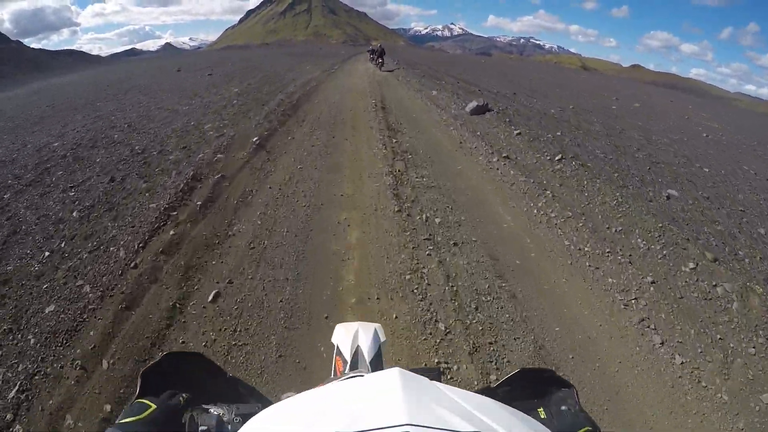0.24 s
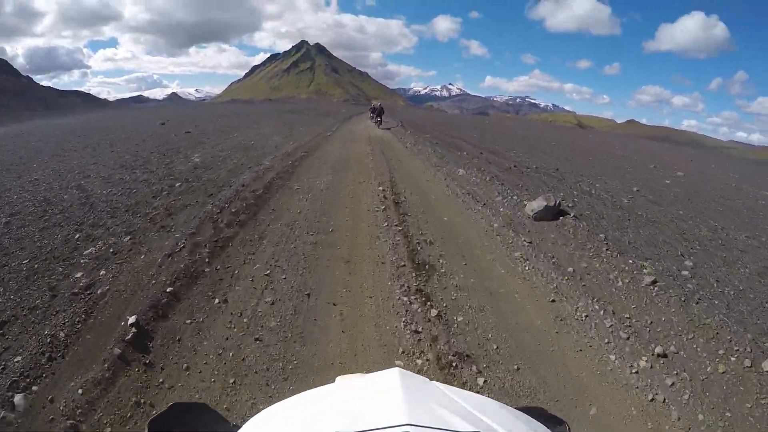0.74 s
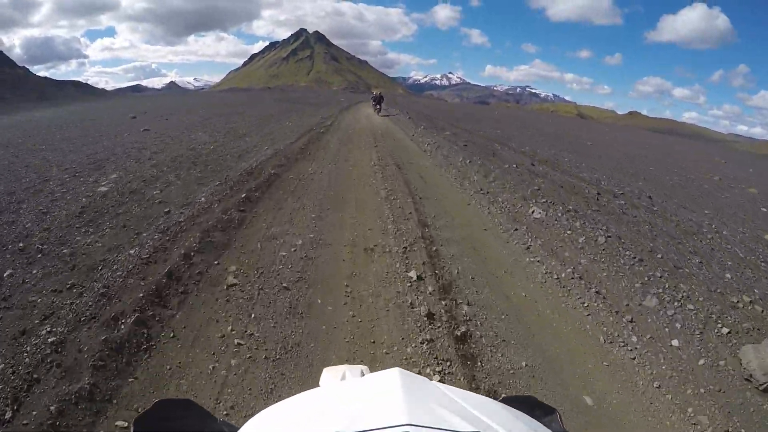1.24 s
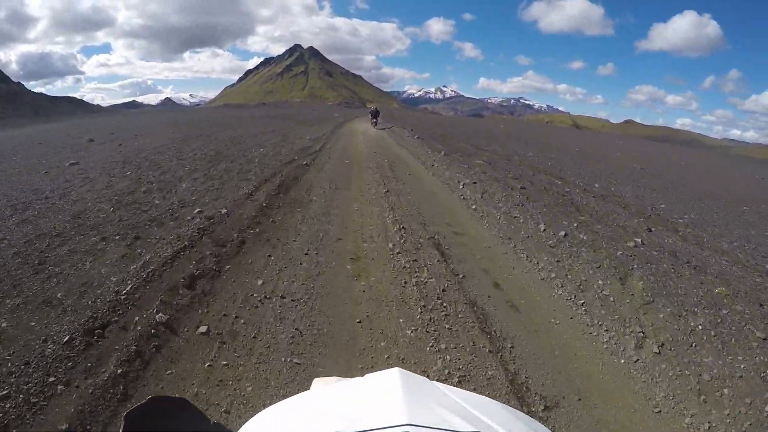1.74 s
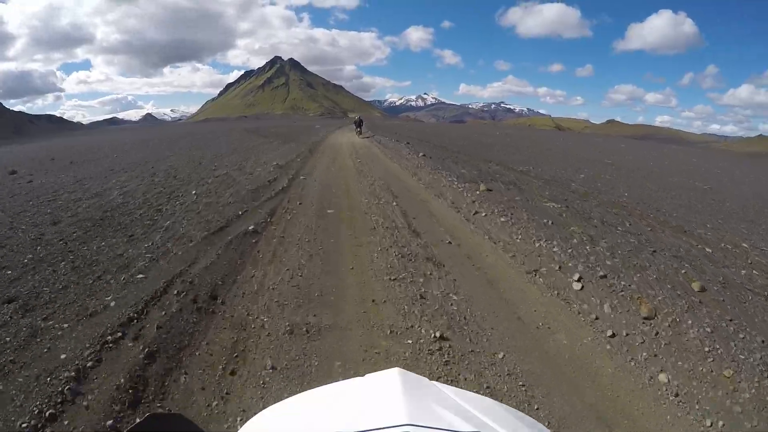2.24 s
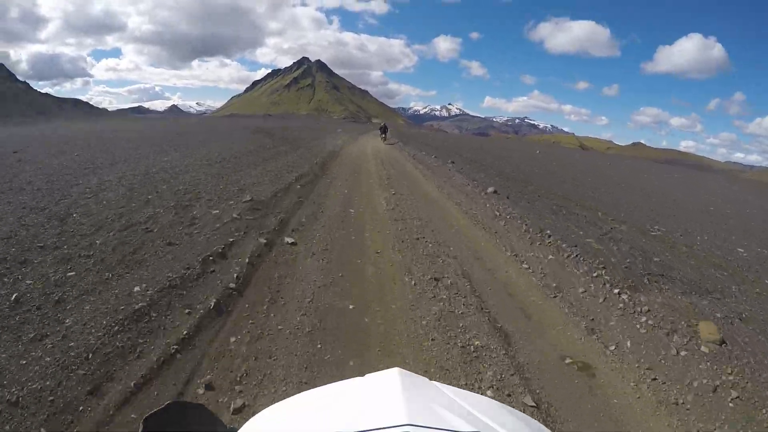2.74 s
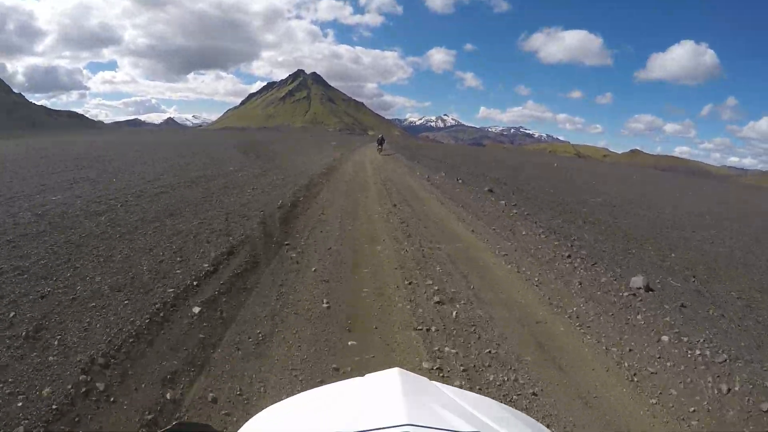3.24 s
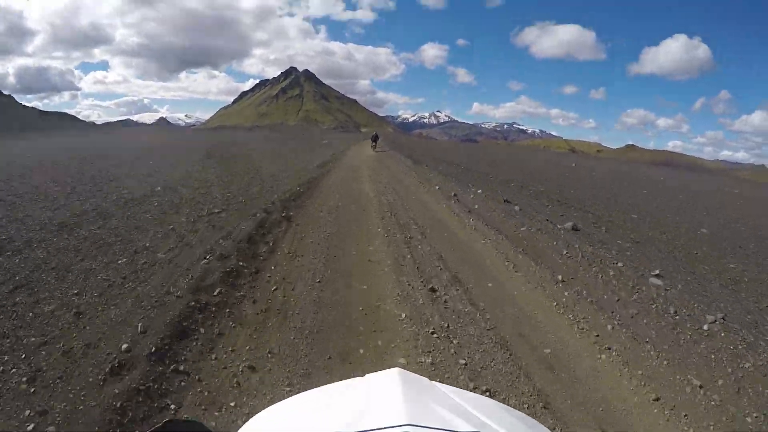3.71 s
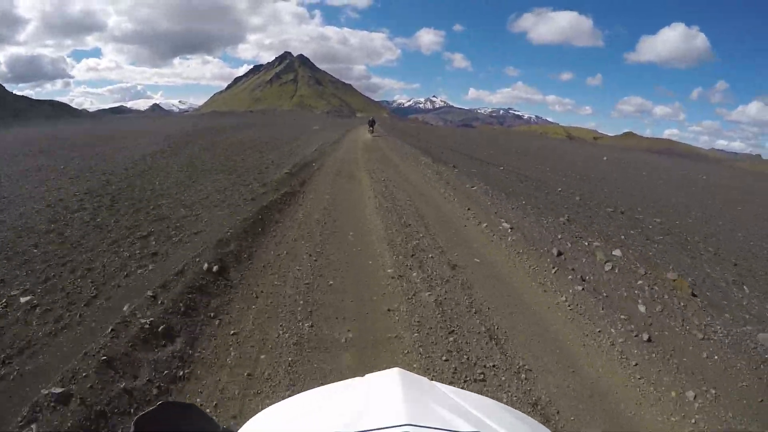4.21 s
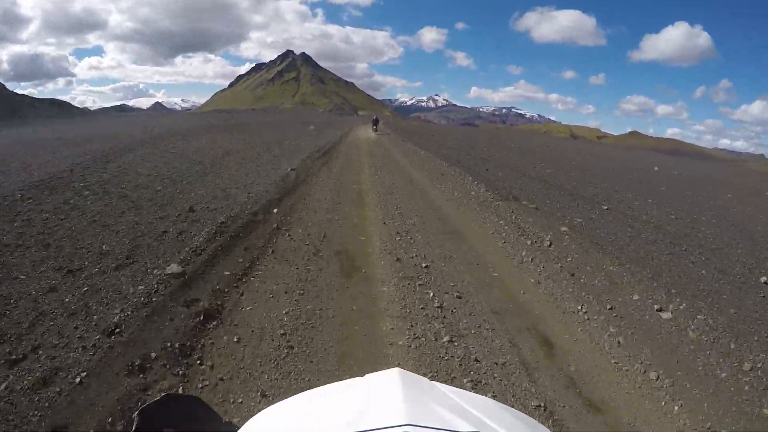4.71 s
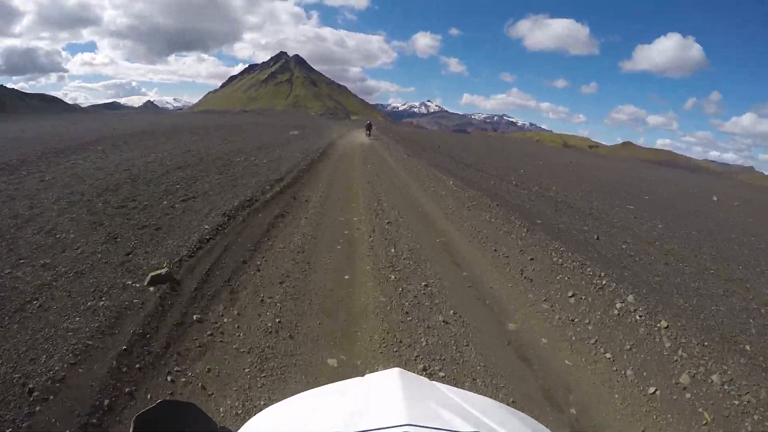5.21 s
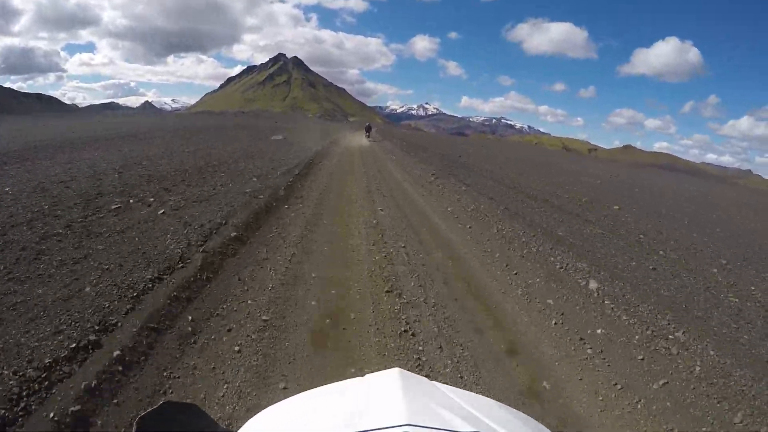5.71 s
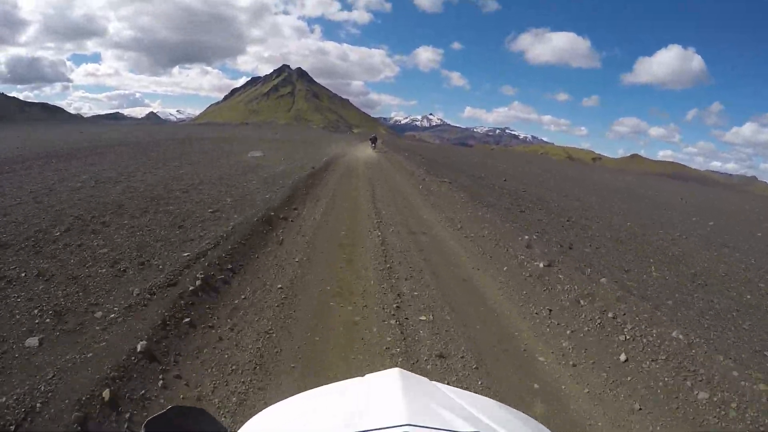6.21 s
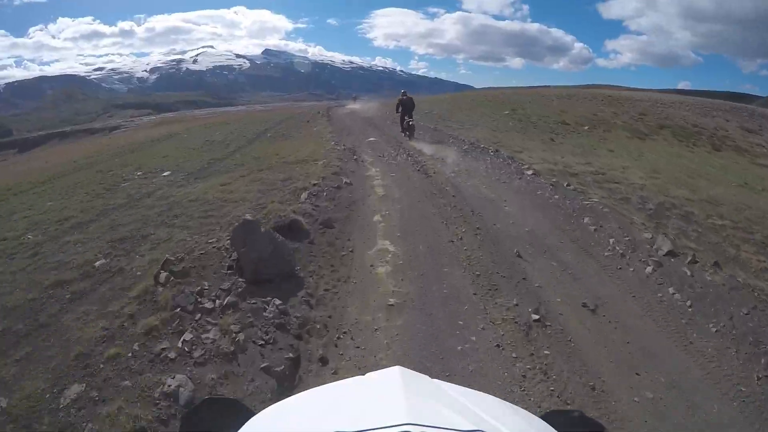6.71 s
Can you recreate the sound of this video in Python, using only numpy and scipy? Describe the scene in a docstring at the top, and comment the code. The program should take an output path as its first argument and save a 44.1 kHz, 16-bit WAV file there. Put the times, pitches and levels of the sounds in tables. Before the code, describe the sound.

Low wind buffeting and the thudding exhaust of a dirt bike are heard close up from the rider's position outdoors. The revs rise with a light mechanical ticking, drop at a gear change, then build slowly as a fluttering wind hiss swells over them. A single hard, plastic-sounding knock overloads the microphone. Shortly before the end, a sudden cut leaves the engine running lower and the wind less bright.

```python
"""A single-cylinder dirt bike pulls along a gravel track and shifts up once, heard from a microphone on the
rider. Firings thump the exhaust; valve gear and chain clatter. Wind buffets the microphone housing and hisses
at its edges, growing with speed; low booms swell where the engine's note passes a resonance. One sharp knock,
likely a stone, overloads the microphone and ducks the gain. Near the end the ride jumps to another stretch of
track."""
import sys
import numpy as np
from scipy import signal
from scipy.fft import rfft, irfft
from scipy.io import wavfile
from scipy.ndimage import uniform_filter1d

SR = 44100
rng = np.random.default_rng(int(sys.argv[2]) if len(sys.argv) > 2 else 0)


def store_wav(level_fs):
    """Save 16-bit WAV to argv[1]."""
    pcm = np.round(np.clip(np.atleast_2d(level_fs), -1, 1) * 32767)
    wavfile.write(sys.argv[1], SR, pcm.T.astype(np.int16))


N = 306495
TIME_S = np.arange(N) / SR
JUMP_S = 6.414  # second stretch starts
SHUT_S, SHUT_FALL_S, OPEN_S, OPEN_RISE_S = 2.66, 0.42, 3.22, 0.17  # throttle in the upshift
CRUISE_HZ = 26  # reference firing rate

# Airflow, sagging in the shift. Each row: time in seconds, hiss level in dB.
AIRFLOW = [(0, -41), (.45, -42), (.78, -35.5), (2.1, -29.5), (2.3, -24), (2.83, -20), (3.47, -23),
           (3.8, -20), (4.75, -18.5), (5.45, -17), (6.95, -16.5)]
# Gusts. Each row: centre in seconds, half-length in seconds, added buffet in dB, added airflow in dB.
GUSTS = [(.62, 0.044, 1, 4.5), (1.05, 0.056, 1.5, 2), (1.853, 0.076, -0.5, 4), (2.305, 0.072, -2, 2),
         (2.703, 0.08, 2, 0.5), (3.84, 0.12, 3.5, 2), (4.567, 0.13, 3, 0.5), (5.52, 0.15, 3.5, 0),
         (6.0, .17, 4.5, 0)]
# Pressure swirls on the housing. Each row: frequency in Hz, relative level in dB.
BUFFET_SPECTRUM = [(8, -38), (18, 7), (30, 1), (55, -3.5), (85, -0.5), (112, -3), (135, -12.5),
                   (170, -17.5), (300, -20), (800, -54.5)]
# Air and tyre roar. Each row: frequency in Hz, relative level in dB.
ROAR_SPECTRUM = [(80, -8), (170, 2), (240, 1), (380, 4), (550, 2), (700, 4), (850, -1), (1100, -5),
                 (1500, -2), (2100, 5), (2800, -3.5), (5000, -42), (15000, -59)]
# Edge hiss. Each row: frequency in Hz, relative level in dB on the first stretch, same on the second.
HISS_SPECTRUM = [(500, -27, -34), (1020, -28, -18), (1510, -20.5, -4.5), (2230, -9.5, -10.5), (2360, -6, 1),
                 (3315, 0.5, 2.5), (3440, -3, -4.5), (3928, -0.5, -6), (4180, -13.5, -9),
                 (4610, -16.5, -25), (4910, -24, -25), (7080, -32.5, -34.5), (11600, -44, -41),
                 (14700, -62, -64)]
# Fine spray of the fastest air. Each row: frequency in Hz, relative level in dB.
SPRAY_SPECTRUM = [(1000, -31), (3500, -7), (4600, 8), (5500, 7.5), (7000, -1), (10000, -7), (12300, -6),
                  (15000, -21)]
# Peaks and notches of the housing's cavities. Each row: centre in Hz, width in Hz, gain in dB.
CAVITIES = [(1820, 28, -0.5), (2993, 36, 4.5), (4540, 130, 4), (5550, 245, 7), (6000, 150, -5.5),
            (6410, 210, 8.5), (8200, 250, -2)]
# Low booms. Each row: centre in seconds, frequency in Hz, level in dB.
LOW_BOOMS = [(.62, 97, -25.5), (3.03, 101, -25.5), (3.37, 100, -22.5), (3.95, 102.8, -25.5),
             (5.6, 100, -25), (6.0, 75.4, -23), (6.25, 104, -25.5)]
# Knock on the housing: start in seconds, gain in dB.
KNOCK = (4.6885, 11.2)
# Housing shell modes. Each row: frequency in Hz, T60 in seconds, relative level in dB.
SHELL_MODES = [(1716, 0.0063, 3), (1803, 0.041, -10), (1910, 0.039, -7), (3780, 0.012, -3),
               (4500, 0.0079, -4), (6440, 0.0087, -6.5), (7950, 0.0049, -5.5), (12100, 0.0022, -6)]
# Ring of valve gear and chain. Each row: frequency in Hz, relative level in dB.
CLATTER_SPECTRUM = [(500, -4), (1130, 1), (1320, 10), (1650, 5), (2200, 3.5), (3000, 9), (4000, -0.5),
                    (4400, -8), (5300, -6.5), (6500, -19), (8000, -18.5), (15000, -48)]
# Engine orders, low boom to high firing harmonics. Each row: multiple of the firing rate, base level in dB.
ENGINE_ORDERS = [(2, -41), (3, -50.5), (4, -46.5), (5, -54), (8, -58), (10, -57.5), (14, -53.5),
                 (15, -57.5)]
# Resonances the orders sweep through. Each row: centre in Hz, width in Hz, lift in dB.
ORDER_RESONANCES = [(115.7, 27, 8), (266.5, 16, 10.5), (450, 21, 7)]
# Exhaust, airbox and casing modes. Each row: frequency in Hz, width in Hz, relative gain in dB.
EXHAUST_MODES = [(100, 25, 1), (280, 66, -6), (344, 33, -1.5), (459, 32, 4.5), (670, 30, -7), (949, 19, -5),
                 (1264, 38, -7.5), (1362, 17.7, 1.5)]
# Revs through two gears on the first stretch. Each row: time in seconds, firing rate in Hz.
REVS = [(0.0, 19.9), (0.51, 22.6), (1.73, 28.8), (2.73, 34.2), (2.87, 31.3), (3.1, 25.4), (3.33, 25.1),
        (5.79, 32.1), (6.4, 32.6)]


def undb(db):
    """Decibels to gain."""
    return 10 ** (np.asarray(db) / 20)


def unit(x):
    """Scale to rms 1."""
    return x / np.sqrt(np.mean(x ** 2))


def bell(x, centre, width):
    """Gaussian, peak 1."""
    return np.exp(-((x - centre) / width) ** 2)


def curve(rows):
    """Timed table to one value a sample."""
    return np.interp(TIME_S, *np.transpose(rows))


def drift(rate_hz):
    """Low-passed noise, rms 1."""
    hz = np.fft.rfftfreq(N, 1 / SR)
    return unit(irfft(rfft(rng.standard_normal(N)) / (1 + (hz / rate_hz) ** 2), N))


def colour(x, spectrum, peaks=(), column=1):
    """Shape x by a spectrum column plus peaks and notches; rms 1."""
    hz, spectrum = np.fft.rfftfreq(N, 1 / SR), np.array(spectrum)
    db = np.interp(np.log(np.maximum(hz, 1)), np.log(spectrum[:, 0]), spectrum[:, column])
    db += sum(gain_db * bell(hz, centre, width) for centre, width, gain_db in peaks)
    return unit(irfft(rfft(x) * undb(db), N))


def airflow(later, buffet_db_per_db=0.19):
    """Air and buffet levels in dB: both rise with road speed, gusts on top."""
    air_db = curve(AIRFLOW)
    buffet_db = -23.5 + buffet_db_per_db * air_db - 1.5 * later
    for centre_s, half_s, gust_buffet_db, gust_air_db in GUSTS:
        gust = bell(TIME_S, centre_s, half_s)
        air_db += gust_air_db * gust
        buffet_db += gust_buffet_db * gust
    return air_db, buffet_db


def wind(roar_db_per_db=0.6, spray_db_per_db=2.29, shelter_db=-7):
    """Swirls buffet the housing; eddies flutter roar and hiss. Faster air is louder and brighter."""
    later = TIME_S >= JUMP_S  # less roar, lower hiss, no spray
    air_db, buffet_db = airflow(later)
    eddies, surges = drift(130), drift(5.7)
    buffet = colour(rng.standard_normal(N), BUFFET_SPECTRUM) * undb(buffet_db)
    roar = colour(rng.standard_normal(N) * undb(0.93 * eddies), ROAR_SPECTRUM)
    roar *= undb(-17.5 + roar_db_per_db * air_db + shelter_db * later)
    jet = rng.standard_normal(N) * undb(0.5 * eddies + 0.66 * surges)
    first_hiss = colour(jet, HISS_SPECTRUM, CAVITIES)
    later_hiss = colour(jet, HISS_SPECTRUM, CAVITIES, column=2)
    hiss = np.where(later, later_hiss, first_hiss) * undb(air_db)
    spray = colour(rng.standard_normal(N), SPRAY_SPECTRUM, CAVITIES)
    spray *= undb(2 + spray_db_per_db * air_db) * ~later
    return buffet + roar + hiss + spray


def low_booms(half_s=0.038):
    """A low tone near 100 Hz swells and dies, mostly the engine's note passing a resonance."""
    booms = np.zeros(N)
    for centre_s, hz, db in LOW_BOOMS:
        tone = np.sqrt(2) * np.sin(2 * np.pi * (hz * TIME_S + rng.random()))
        booms += undb(db) * bell(TIME_S, centre_s, half_s) * tone
    return booms


def knock(crack_db=-7.5, crack_s=0.0012):
    """Hard, tiny contact: a crack and the short ring of the plastic shell."""
    start_s, gain_db = KNOCK
    age_s = np.maximum(TIME_S - start_s, 0)
    ring = sum(undb(db - 60 * np.minimum(age_s / t60_s, 2)) * np.sin(2 * np.pi * hz * age_s)
               for hz, t60_s, db in SHELL_MODES)
    crack = undb(crack_db) * np.exp(-np.minimum(age_s / crack_s, 20)) * rng.standard_normal(N)
    return undb(gain_db) * (ring + crack) * (TIME_S >= start_s)


def clatter(cycles, firing_hz, tick_phase=0.504, tick_s=0.003, scatter_db=0.9, whirr=0.14):
    """Valve gear ticks once a cycle over the chain's even whirr."""
    tick_age = ((cycles - tick_phase) % 1) / firing_hz / tick_s
    ticks = undb(scatter_db * drift(16)) * tick_age * np.exp(1 - tick_age)
    return colour((whirr + ticks) * rng.standard_normal(N), CLATTER_SPECTRUM, CAVITIES[:2])


def hum(cycles, firing_hz, exhaust_db, load_share=0.29, low_gear_db=3, waver_db=2.5, lug_db=13):
    """Engine orders swell under load, in the lower gear and through resonances."""
    lug = np.clip((CRUISE_HZ - firing_hz) / 6, 0, 1)
    pull_db = load_share * (exhaust_db - exhaust_db.mean())
    pull_db += low_gear_db * np.clip((OPEN_S - TIME_S) / SHUT_FALL_S, 0, 1)
    tones = np.zeros(N)
    for order, base_db in ENGINE_ORDERS:
        lift_db = sum(db * bell(order * firing_hz, hz, width) for hz, width, db in ORDER_RESONANCES)
        level_db = base_db + lift_db + pull_db + waver_db * drift(3)
        if order == 2:  # crank's once-a-turn shake dominates at low revs
            level_db += lug_db * lug
        tones += undb(level_db) * np.sqrt(2) * np.cos(2 * np.pi * order * cycles)
    return tones


def exhaust(cycles, firing_hz, jitter_s=0.00004, scatter_db=1, gas_db=-18, gas_s=0.010):
    """Each firing rings the pipe with a pulse and a puff of gas."""
    firings = np.flatnonzero(np.diff(np.floor(cycles)))
    timing, strength = rng.standard_normal((len(firings), 2)).T
    firings += (jitter_s * SR * timing).astype(int)
    pulses = np.zeros(N)
    pulses[np.clip(firings, 0, N - 1)] = undb(scatter_db * strength)
    gas = np.exp(-(cycles % 1) / firing_hz / gas_s) * rng.standard_normal(N)
    drive = unit(pulses) + undb(gas_db) * unit(gas)
    pipe = np.zeros(N)
    for k, (hz, width_hz, db) in enumerate(EXHAUST_MODES):
        mode = signal.lfilter(*signal.iirpeak(hz, hz / width_hz, fs=SR), drive)
        pipe += (-1) ** k * undb(db) * mode  # neighbours in opposite phase
    return unit(pipe)


def engine(later_hz=25.54, later_rise_hz_per_s=2.88, later_throttle=0.25):
    """Two gears, then a gentle pick-up on the second stretch. Levels follow revs and throttle."""
    later = TIME_S >= JUMP_S
    firing_hz = np.where(later, later_hz + later_rise_hz_per_s * (TIME_S - JUMP_S), curve(REVS))
    cycles = 0.1003 + np.cumsum(firing_hz) / SR
    roll_off = np.clip((TIME_S - SHUT_S) / SHUT_FALL_S, 0, 1)
    reopen = np.clip((TIME_S - OPEN_S) / OPEN_RISE_S, 0, 1)
    shut = np.where(later, 1 - later_throttle, roll_off - reopen)
    octaves = np.log2(firing_hz / CRUISE_HZ)
    exhaust_db = -38.5 + 10 * octaves - 13 * shut
    clatter_db = -40 + 3.5 * octaves - 14 * shut
    return (exhaust(cycles, firing_hz) * undb(exhaust_db)
            + clatter(cycles, firing_hz) * undb(clatter_db)
            + hum(cycles, firing_hz, exhaust_db))


def scene():
    """All sources at one microphone."""
    return (engine() + wind() + low_booms() + knock())[None]


def limiter(x, max_cut_db=7.5, release_db_per_s=10, ahead_s=0.012, attack_s=0.008):
    """Look-ahead gain cut above full scale, with slow recovery."""
    over_db = np.clip(20 * np.log10(np.abs(x) + 1e-9), 0, max_cut_db)
    release_db = release_db_per_s * TIME_S
    held_db = np.maximum.accumulate(over_db + release_db) - release_db
    early_db = np.interp(TIME_S + ahead_s, TIME_S, held_db)
    cut_db = uniform_filter1d(early_db, int(attack_s * SR))
    return x * undb(-cut_db)


def record(dry, ceiling=0.9, top_hz=15250):
    """Microphone chain: limiter, hard clip, steep low-pass."""
    clipped = np.clip(limiter(dry[0]), -ceiling, ceiling)
    lowpass = signal.ellip(12, 0.2, 90, top_hz, fs=SR, output="sos")
    return signal.sosfilt(lowpass, clipped)[None]


dry = scene()
out = record(dry)
store_wav(out)
```